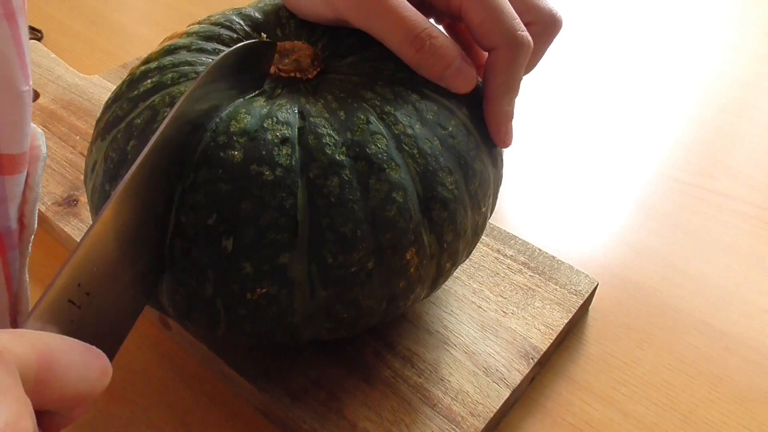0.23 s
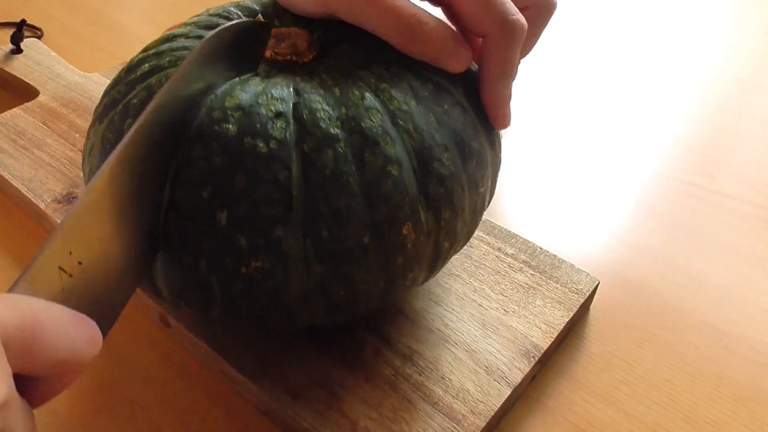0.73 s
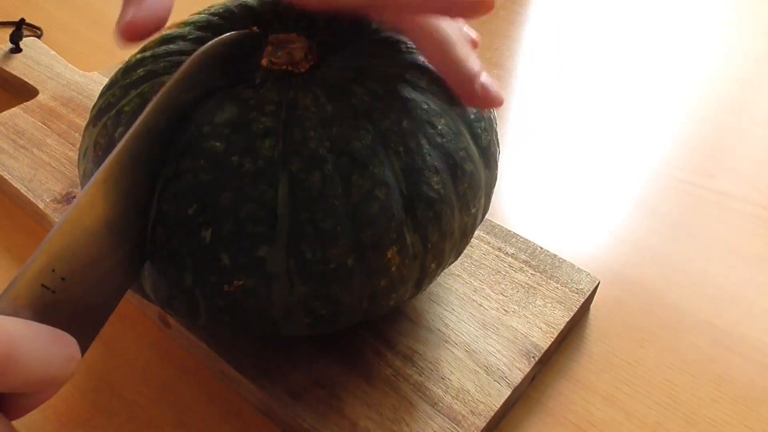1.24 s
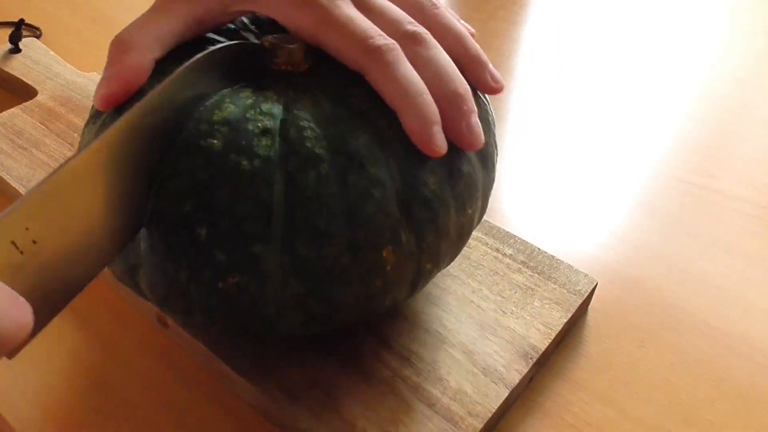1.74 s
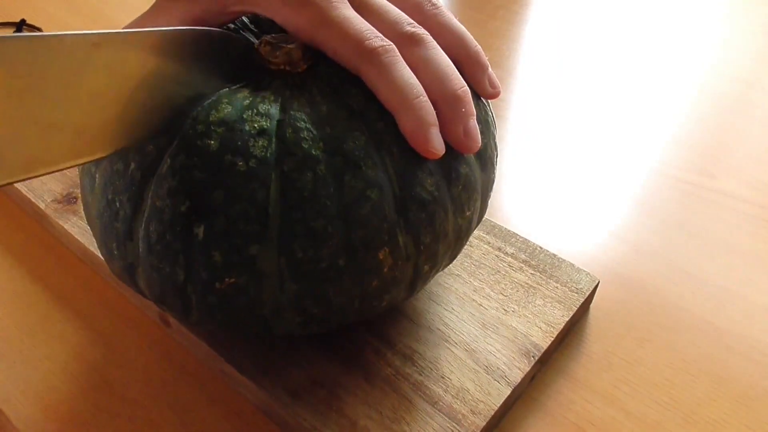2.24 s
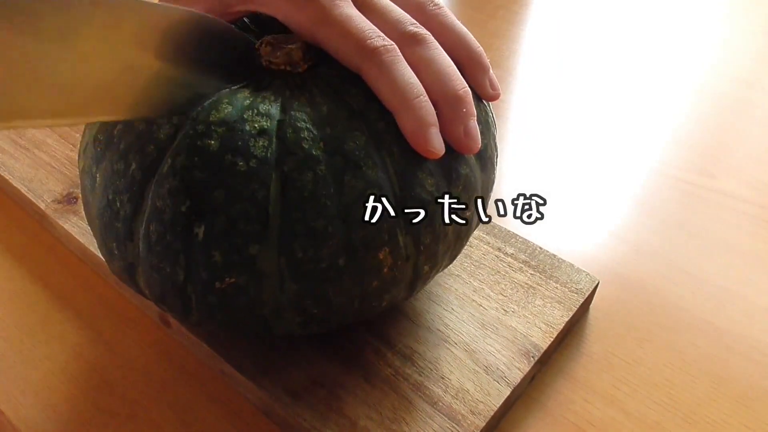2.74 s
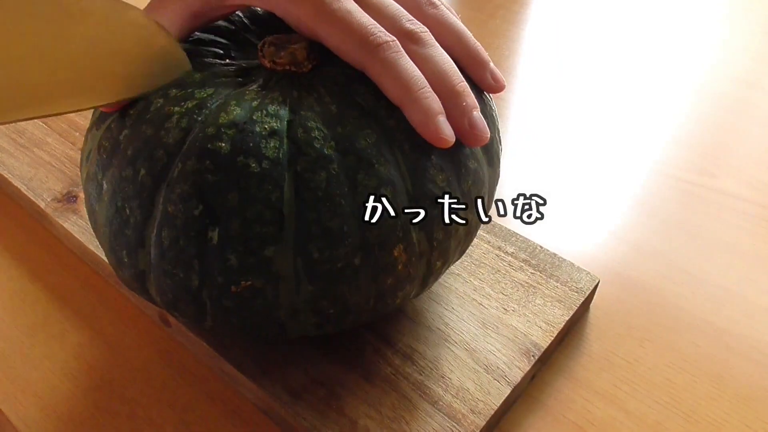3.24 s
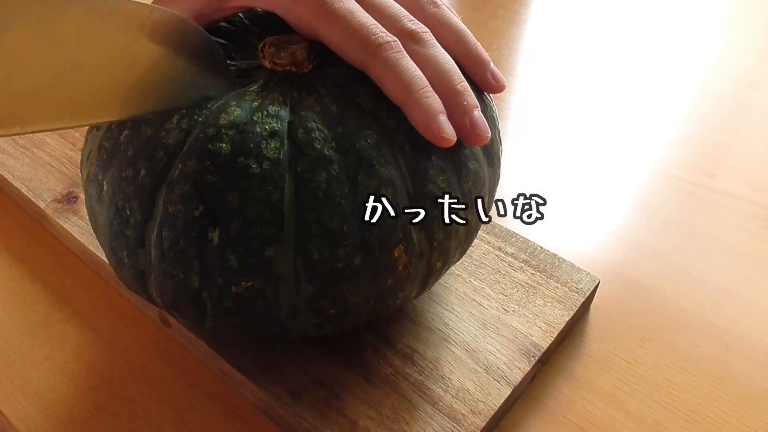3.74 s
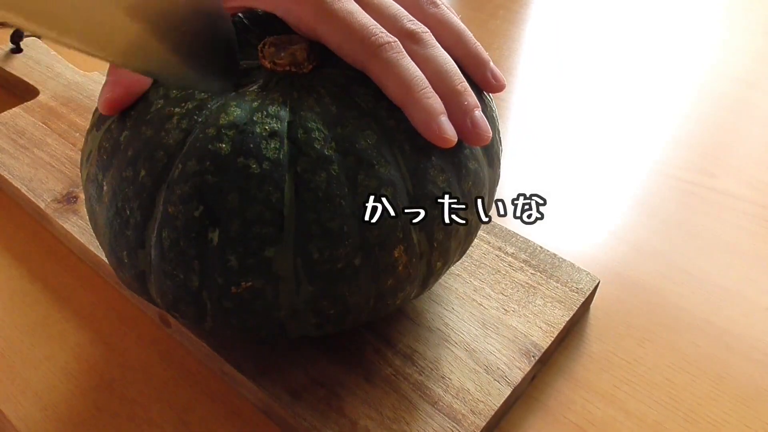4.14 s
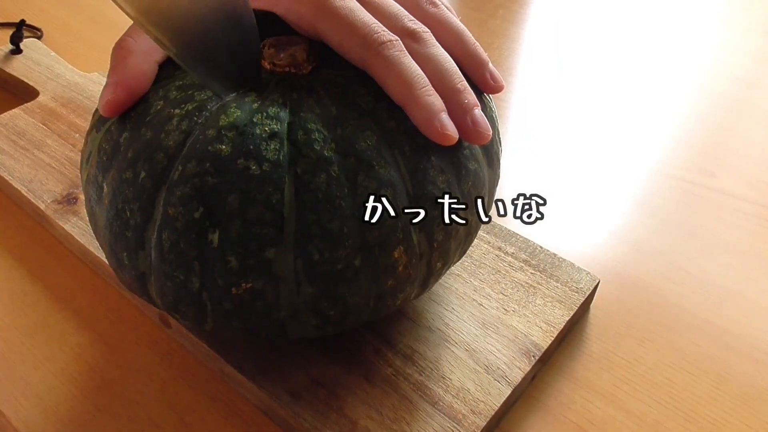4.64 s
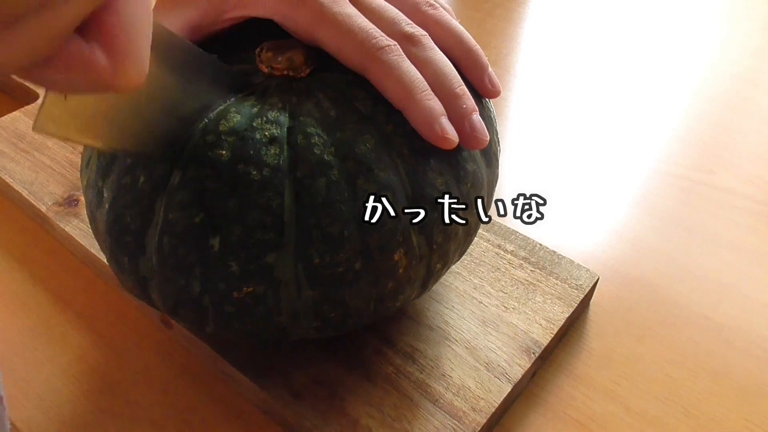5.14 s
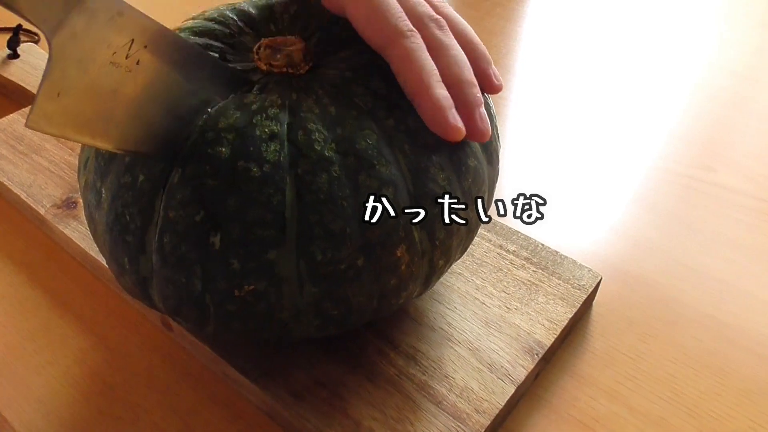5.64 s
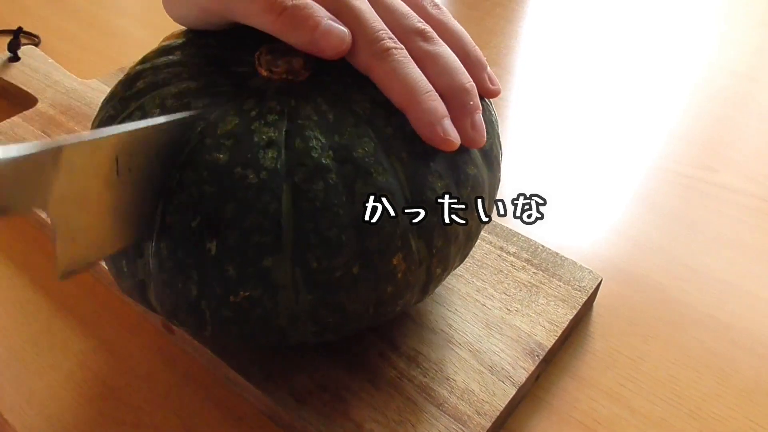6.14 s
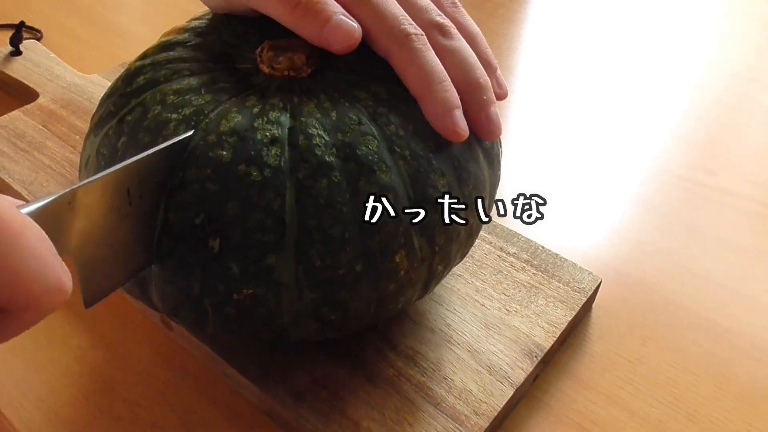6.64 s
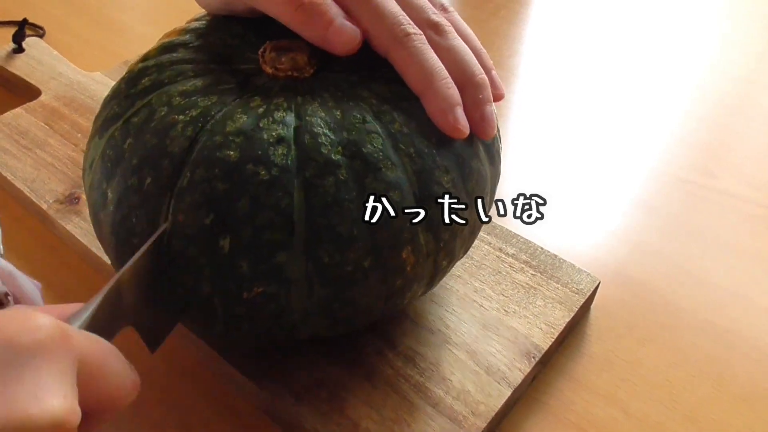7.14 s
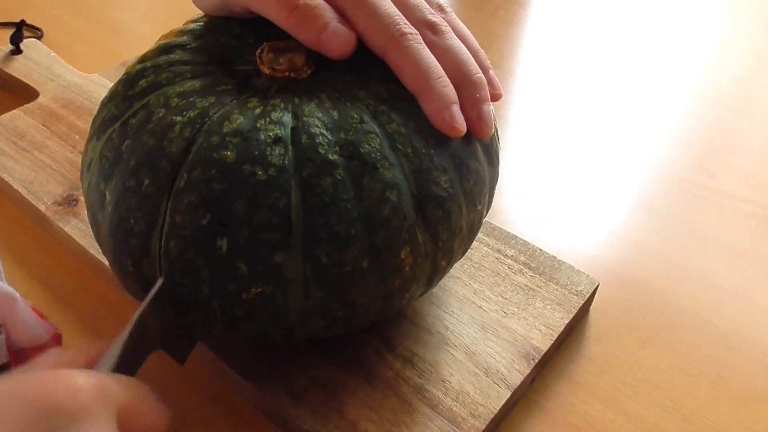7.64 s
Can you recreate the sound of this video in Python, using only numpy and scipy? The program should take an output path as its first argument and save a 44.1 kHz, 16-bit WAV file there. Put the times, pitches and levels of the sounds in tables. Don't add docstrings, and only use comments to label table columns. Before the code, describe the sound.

A small, quiet kitchen heard close in stereo, with low hum, light hiss and a faint fast-ticking motor throughout. At 0-0.5 s fingers rub the squash skin, with a soft scrape and small cracks. Around 1.1-1.4 s the rind snaps sharply over dull wooden thumps; stronger cracks and knocks cluster at 1.7-2.1 s. After a lull, the blade springs free with a thin tink at 2.9 s, followed by a crack and thump. From 3.6 to 5 s it is quieter: brief metallic chatter, light taps, short scrapes. At 5.1-5.5 s pressing brings crunches and brittle snaps. A solid thump lands at 6.05 s amid gritty scraping and cracks until 6.6 s. Scraping resumes near 6.9 s, then at 7.2 s the loudest moment: flesh rips in a bright crackle and the squash lands heavily. A final crack and clustered thumps come around 7.75 s.

```python
import sys
import numpy as np
from scipy import signal
from scipy.fft import rfft, irfft, next_fast_len
from scipy.io import wavfile
from scipy.ndimage import uniform_filter1d

SR = 44100
rng = np.random.default_rng(int(sys.argv[2]) if len(sys.argv) > 2 else 0)


def convert_level_to_amplitude(level_db):
    exponent = np.asarray(level_db, float) / 20
    return 10 ** exponent


def store_wav(level_fs):
    pcm = np.round(np.clip(np.atleast_2d(level_fs), -1, 1) * 32767)
    wavfile.write(sys.argv[1], SR, pcm.T.astype(np.int16))


N = 347949


def evened(x):
    return x / np.sqrt(np.mean(x ** 2) + 1e-20)


def read(points, hz):
    f, value = np.transpose(points)
    return np.interp(np.log(hz + 1), np.log(f + 1), value)


def follow(points):
    s, db = np.transpose(points)
    return np.interp(np.arange(N) / SR, s, db, -150, -150)


def add(mix, s, sound):
    part = mix[..., round(s * SR):][..., :sound.shape[-1]]
    part += sound[..., :part.shape[-1]]


def resonate(x, hz, width):
    return signal.lfilter(*signal.iirpeak(hz, hz / width, SR), x)


def resonate_twice(x, hz, width):
    return resonate(resonate(x, hz, width), hz, width)


def sing(rub, modes):
    return evened(sum(convert_level_to_amplitude(db) * evened(resonate_twice(rub, hz, width)) for hz, width, db in modes))


def glide(x, hz, width):
    turn = np.exp(2j * np.pi * np.cumsum(hz) / SR)
    r = np.exp(-np.pi * width / SR)
    smooth = signal.lfilter([(1 - r) ** 2], [1, -2 * r, r * r], x * turn.conj())
    return 2 * (turn * smooth).real


def ring(modes, t, rise, vary=0.95, apart=0., flip=1):
    hz, db, t60 = np.transpose(modes)[:, :, None]
    level, tune, phase = rng.standard_normal((len(modes), 3)).T[:, :, None]
    step = apart * phase * np.array([.5, -.5])[:, None, None]
    sines = np.sin(2 * np.pi * hz * (1 + 0.019 * vary * tune) * t + step)
    signs = flip ** np.arange(len(modes))[:, None]
    waves = signs * convert_level_to_amplitude(db + 2 * vary * level - 60 * t / t60) * sines
    return waves.sum(1) * (1 - np.exp(-t / rise)) ** 2


def colour(x, gain):
    size = next_fast_len(N)
    return irfft(rfft(x, size) * gain(np.fft.rfftfreq(size, 1 / SR)), size)[..., :N]


# frequency in Hz, level in dB per Hz.
AIR = [(12, -45), (20, -28), (124, -7), (230, -14.5), (289, -0.5), (314, -15.5), (382, -7), (690, -14.5),
       (863, -12), (2010, -33.5), (3830, -37.5), (6170, -42), (9150, -34), (15200, -40.5), (16500, -50)]
# frequency in Hz, width in Hz, level in dB.
WHINE = [(9040, 200, -78.5), (10530, 340, -84), (1290, 520, -72.5)]
# frequency in Hz, likeness from 0 to 1.
AIR_SAME = [(60, 0.87), (180, 0.91), (550, 0.6), (1650, 0.48), (4970, 0.031), (15000, 0.043)]
# frequency in Hz, left minus right in dB.
AIR_BALANCE = [(60, -3.5), (240, -3), (950, -0.5), (3770, 0), (15000, -1.5)]


def air():
    frames, hz = N // 256 + 5, np.fft.rfftfreq(1024, 1 / SR)
    a, b, c, d, patches = rng.standard_normal((frames, 513, 5)).T
    patches = evened(uniform_filter1d(uniform_filter1d(patches, 12, 0), 14, 1))
    same = np.clip(read(AIR_SAME, hz), -1, 1)[:, None]
    left, other = a + 1j * b, c + 1j * d
    z = np.array([left, same * left + np.sqrt(1 - same ** 2) * other])
    lean_db = read(AIR_BALANCE, hz)[:, None] / 2
    z *= convert_level_to_amplitude(read(AIR, hz)[:, None] + 1.8 * patches + np.array([lean_db, -lean_db]))
    hum = convert_level_to_amplitude(-53) * evened(signal.istft(z, nperseg=1024, noverlap=768)[1][:, :N])
    hiss = rng.standard_normal((2, N))
    return hum + sum(convert_level_to_amplitude(db) * evened(resonate_twice(hiss, f, width)) for f, width, db in WHINE)


# time in seconds, level in dB.
MOTOR_LEVEL = [(0, -85), (2.1, -73.5), (3.5, -92), (5.0, -93), (7.5, -76)]


def motor():
    ticks_per_s, housing_hz, width_hz = 67.3, 3750, 320
    t = np.arange(N) / SR
    puffs = np.exp(-(t * ticks_per_s % 1) / 0.15) * rng.standard_normal((2, N))
    ringing = resonate_twice(puffs[0] + 1.8 * puffs, housing_hz, width_hz)
    return convert_level_to_amplitude(np.interp(t, *np.transpose(MOTOR_LEVEL))) * evened(ringing)


# frequency in Hz, time to fall 60 dB in seconds.
ROOM = [(100, 0.67), (1000, 0.24), (10000, 0.008)]


def room(x):
    taps = np.zeros((2, SR // 2))
    at = np.arange(120, SR // 2 - 20, 20)
    at = at + rng.integers(0, 20, (2, len(at)))
    np.put_along_axis(taps, at, rng.choice([-1., 1.], at.shape), 1)
    hz, t, z = signal.stft(taps, SR, nperseg=256)
    tail = signal.istft(z * convert_level_to_amplitude(-60 * t / read(ROOM, hz)[:, None]), SR, nperseg=256)[1]
    return signal.fftconvolve(x[None], tail / np.linalg.norm(tail[0]), axes=1)[:, :N]


# delay in milliseconds, gain.
ECHOES = [
    [(.5, -0.03), (1.6, -0.15)],
    [(.8, -0.088), (2.1, 0.21)],
]


def echoed(x):
    return [one + sum(g * np.roll(one, round(ms * SR / 1000)) for ms, g in taps) for one, taps in zip(x, ECHOES)]


# time in seconds, level in dB.
HAND = [(0, -54), (.12, -54), (.2, -45.5), (.28, -51.5), (.34, -58)]


def hand():
    rub = rng.standard_normal(N)
    skin = evened(resonate(rub, 443, 54) + 0.051 * resonate(rub, 550, 160))
    return convert_level_to_amplitude(follow(HAND)) * skin


# frequency in Hz, level in dB, time to fall 60 dB in seconds.
TABLE = [(104.3, 1, 0.1), (136.9, 3.5, 0.28)]
BOARD = [(175.7, -1, 0.12), (202, 3.5, 0.12), (246, -2, 0.14)]
BODY = [(233, -20, 0.014), (273.4, 6.5, 0.07), (310.6, 9.5, 0.077), (382, -5.5, 0.15), (437, -3, 0.085),
        (509.5, -6, 0.08), (631, -2, 0.038), (790, -17.5, 0.18), (1114, -14.5, 0.12)]
KNOCK = [(554, -11, 0.028), (700, -20, 0.021)]
SWAY = [(48, 12, 0.16)]
# start in seconds, blow in dB, weight passed into the wood in dB against the blow.
ROCKS = [(0.296, -41, -3), (1.122, -35.5, -4), (1.143, -34, -6), (1.165, -37, 0), (1.731, -30.5, 1.5),
         (1.737, -25.5, -10), (1.747, -29.5, -9), (1.829, -32, -1), (1.847, -40, -1), (1.981, -30.5, 2.5),
         (1.988, -30.5, 1), (2.985, -39.5, 3.5), (5.137, -45, 5), (5.252, -42, -2), (5.404, -42, -3.5),
         (6.043, -30, -9), (6.049, -24.5, 2), (6.404, -31.5, 0), (6.792, -54, 11), (7.197, -25, 0),
         (7.2032, -15.5, 2), (7.357, -40, 6), (7.3605, -30, -8), (7.46, -36.5, -3), (7.594, -45.5, 4),
         (7.738, -32, -5), (7.744, -27, -4), (7.761, -21.5, -6.5), (7.789, -28.5, -10)]
# start in seconds, blow in dB.
JOLTS = [(2.871, -37), (3.626, -34), (3.641, -39), (4.264, -39), (4.595, -43), (4.656, -39.5), (4.915, -39),
         (4.999, -39), (5.845, -39.5), (6.928, -32.5)]
# start in seconds, level in dB.
PUSHES = [
    (1.16, -51),
    (5.135, -47),
    (5.82, -56),
]


def thumps():
    jolt_weight_db, table_db = -9, -3.5
    out, t = np.zeros((2, N)), np.arange(SR // 4) / SR
    for s, db, weight_db in ROCKS + [(s, db, jolt_weight_db) for s, db in JOLTS]:
        s += .0012
        wood_db = db + weight_db
        add(out, s, convert_level_to_amplitude(db - 6.0) * ring(BODY, t[:SR // 8], 0.0011, apart=0.39))
        add(out, s, convert_level_to_amplitude(db) * ring(KNOCK, t[:SR // 16], 0.00029, vary=1.1, apart=1.4))
        add(out, s, convert_level_to_amplitude(wood_db + 1.1) * ring(BOARD, t[:SR // 6], 0.0023, apart=0.048))
        add(out, s, convert_level_to_amplitude(wood_db + table_db) * ring(TABLE, t, 0.0015, apart=0.49))
    out = signal.lfilter(*signal.butter(2, 75, "high", fs=SR), out)
    for s, db in PUSHES:
        add(out, s, convert_level_to_amplitude(db) * ring(SWAY, t, 0.0066, apart=.6))
    return out


# start in seconds, touch in dB, weight in dB.
LANDINGS = [(1.7342, -29, -22), (1.8317, -31, -25), (1.9829, -32, -18.5), (6.0441, -18.5, -15),
            (7.1983, -9.5, -4.5), (7.7389, -25, -24)]


def landings():
    touch_hz, weight_hz, weight_lag_s = 480, 286, 0.00628
    out, t = np.zeros(N), np.arange(-300, 300) / SR
    u = 2 * np.pi * touch_hz * t - np.pi / 2
    w = (np.pi * weight_hz * t) ** 2
    touch = -np.sin(u) * np.exp(-u ** 2 / 8.2)
    crest = (1 - 2 * w) * np.exp(-w)
    for s, touch_db, weight_db in LANDINGS:
        add(out, s + t[0], convert_level_to_amplitude(touch_db) * touch)
        add(out, s + weight_lag_s + t[0], convert_level_to_amplitude(weight_db) * crest)
    return out


# frequency in Hz, width in Hz, level in dB.
WHET_MODES = [(4640, 77, -5), (5270, 36, 0), (6440, 97, -6), (7740, 47, 1), (9210, 100, 6)]
# start in seconds, length in seconds, level in dB.
WHETS = [
    (4.257, .06, -64),
    (4.58, 0.15, -71),
]


def whets():
    out = np.zeros(N)
    for s, length, db in WHETS:
        rub = rng.standard_normal(round(length * SR))
        add(out, s, convert_level_to_amplitude(db) * sing(rub, WHET_MODES) * signal.windows.tukey(len(rub), .4))
    return out


# frequency in Hz, level in dB, time to fall 60 dB in seconds.
BLADE = [(630, 10, 0.021), (950, 3.5, 0.024), (5600, 0, 0.025), (2880, -20, 0.33), (4600, -8, 0.06),
         (4885, -23, 0.75), (9960, -25, 0.4), (6325, -2, 0.028), (7370, -6, 0.045), (8025, -2, 0.03),
         (11470, -14, .04), (13210, -11, .065)]
# start in seconds, level in dB.
TINK = (2.872, -36)
# frequency in Hz, width in Hz, level in dB.
CHATTER_MODES = [(4590, 96, -2), (5100, 500, -3), (5600, 300, -6)]
# time in seconds, level in dB.
CHATTER = [(3.612, -85), (3.63, -65), (3.665, -64), (3.69, -65), (3.73, -86)]


def blade():
    out, t = np.zeros((2, N)), np.arange(SR // 2) / SR
    add(out, TINK[0], convert_level_to_amplitude(TINK[1]) * ring(BLADE, t, 0.00045, vary=0))
    return out + convert_level_to_amplitude(follow(CHATTER)) * sing(rng.standard_normal(N), CHATTER_MODES)


# time of full speed in seconds,
# run-up in seconds, hold in seconds, hiss in dB, squeal of the gripped blade in Hz.
CUTS = [(.2, 0.13, 0.041, -59.5, 7450), (4.287, 0.053, 0.0061, -60, 5250), (4.64, 0.25, 0.031, -62.5, 5770),
        (4.905, 0.053, 0.085, -54.5, 4200), (5.985, 0.04, 0.044, -52, 6450),
        (6.19, 0.079, 0.039, -51.5, 6100), (6.26, 0.16, .05, -51, 7800), (6.88, 0.069, 0.051, -51.5, 7850),
        (7.46, 0.018, 0.021, -45.5, 8200), (7.45, 0.059, .005, -53.5, 8000),
        (7.738, 0.025, 0.023, -44.5, 7500)]
SKIMS = [(1.07, 0.11, 0.0056, -65, 4000), (1.523, 0.024, 0.0029, -58.5, 8700),
         (1.688, .03, .005, -65.5, 6000), (2.868, 0.053, 0.0046, -54.5, 6000), (3.04, 0.2, .005, -62, 7500),
         (4.66, .08, .035, -62, 4300), (5.43, 0.069, 0.0058, -57, 5000), (5.505, 0.16, 0.012, -54.5, 9900),
         (5.527, .05, 0.053, -55, 4070), (6.49, .15, 0.0046, -54.5, 8700)]
RIPS = [(5.146, 0.021, .097, -51.5, 5400), (7.19, 0.062, .018, -43, 7500), (7.212, .02, 0.009, -54, 7500),
        (7.259, 0.0018, 0.013, -36, 7000), (7.275, 0.011, 0.013, -38, 4040),
        (7.325, 0.011, 0.0056, -49.5, 7000), (7.361, 0.0032, 0.023, -51, 2600)]
GRINDS = [(1.2, 0.17, 0.01, -80.5, 5000), (1.79, 0.11, 0.0082, -75, 5000), (2.9, .1, 0.011, -82.5, 6000),
          (4.62, .15, 0.065, -82.5, 6000), (6.33, 0.13, 0.0015, -70.5, 8100),
          (7.385, .01, 0.014, -76.5, 6000), (7.5, .03, 0.026, -79, 8000),
          (7.208, 0.031, 0.004, -59.5, 7500)]
# force in dB over the hiss, fall in dB per second.
CUT = (9.9, 390)
SKIM = (0, 320)
RIP = (9.6, 3300)
GRIND = (32.2, 356)
# time in seconds, level in dB.
CONTACT = [(0, -66.5), (.13, -73), (.31, -79), (1, -73.5), (1.3, -78), (1.72, -76), (1.86, -66),
           (2.1, -78.5), (3.2, -83.5), (5, -80), (5.3, -67), (5.65, -70), (5.95, -62.5), (6.08, -70),
           (6.43, -66), (7.07, -67.5), (7.25, -77), (7.89, -71)]


def strokes():
    run_up_db, rumble_share = 26.5, 0.7
    rest_db, rest_rumble_db, rest_share = -73, -58, 0.66
    t = np.arange(0, N + 32, 32) / SR
    hiss_db = np.interp(t, *np.transpose(CONTACT))
    rumble_db = rest_rumble_db + rest_share * (hiss_db - rest_db)
    for rows, (force_db, fall) in (CUTS, CUT), (SKIMS, SKIM), (RIPS, RIP), (GRINDS, GRIND):
        for s, rise, hold, db, hz in rows:
            under = np.maximum(run_up_db * (s - t) / rise, 0) + np.maximum(fall * (t - s - hold), 0)
            hiss_db = np.maximum(hiss_db, db - under)
            rumble_db = np.maximum(rumble_db, db + force_db - rumble_share * under)
    s, _, hold, _, hz = np.transpose(sorted(CUTS + SKIMS + RIPS))
    squeal_hz = np.interp(t, np.ravel([s, s + hold], "F"), np.repeat(hz, 2))
    return (np.interp(np.arange(N) / SR, t, curve) for curve in (hiss_db, rumble_db, squeal_hz))


# frequency in Hz, level in dB per Hz.
SCRAPE = [(2000, -43), (2900, -14), (3700, 1.5), (5500, -2.5), (8000, 0.5), (11000, -2), (14000, -8.5),
          (15600, -14), (16300, -43)]
CRUNCH = [(500, -5.5), (900, 11), (1500, 3), (2300, -12), (3200, -30), (5000, -13)]


def slides():
    hiss_db, rumble_db, squeal_hz = strokes()
    grip = convert_level_to_amplitude(2.2 * evened(uniform_filter1d(rng.standard_normal(N), 100)))
    sizes = convert_level_to_amplitude(2.4 * np.minimum(rng.exponential(1, N), 5))
    grains = rng.standard_normal((3, N)) * sizes * (rng.random(N) < .4)
    grains = grip * (grains[0] + 0.29 * grains[1:])
    hiss = evened(colour(grains, lambda hz: convert_level_to_amplitude(read(SCRAPE, hz))))
    squeal_db = .45 * (hiss_db - rumble_db) - 3.5
    hiss = hiss + convert_level_to_amplitude(squeal_db) * evened(glide(hiss, squeal_hz, 2100))
    crunch = evened(colour(grains, lambda hz: convert_level_to_amplitude(read(CRUNCH, hz))))
    crunch_db = 0.62 * hiss_db + 0.65 * rumble_db + 3.5
    shove = rng.standard_normal((3, N)) * np.sqrt(grip)
    shove = shove[0] + 0.5 * shove[1:]
    modes = BOARD + BODY[1:]
    rumble = evened(sum(convert_level_to_amplitude(db) * np.sqrt(t60) * resonate(shove, hz, 1.47 / t60) for hz, db, t60 in modes))
    return convert_level_to_amplitude(hiss_db) * hiss + convert_level_to_amplitude(crunch_db) * crunch, convert_level_to_amplitude(rumble_db) * rumble


# frequency in Hz, level in dB, time to fall 60 dB in seconds.
HOLLOW = [(1069, 7, 0.012), (1297, -6, 0.017)]
SHELL = [(2240, -5, 0.012), (2476, -10, 0.026), (3057, -6.5, 0.012), (3580, 1, 0.011)]
RIND = [(4910, 3, 0.007), (5425, 5, 0.005), (6070, 9, 0.0042), (7000, 11, 0.0025), (7700, 10, 0.0045),
        (8730, 4, 0.004)]
EDGE = [(9900, 9.5, 0.0016), (10960, -6, 0.0051), (13260, -4, 0.0077), (15200, -6, .005)]
# frequency in Hz, left minus right in dB.
CUT_LEAN = [(2200, 2), (2900, 8.5), (3600, 12), (4300, 4), (5000, -10), (5700, 9), (7300, -16), (8600, -3)]
BREAK_HZ = (2600, 9300)
# hollow in dB, shell in dB, edge brightness in dB, front click in dB.
CRACKS = [(0.3597, -37.5), (0.4726, -41.5), (0.8185, -46.5), (1.1929, -27.5), (1.2246, -47),
          (1.2646, -29.5), (1.381, -42.5), (1.441, -47), (1.7981, -22.5), (1.8422, -37), (1.8856, -25),
          (2.0356, -25), (2.0686, -44), (2.9653, -26), (3.0812, -37.5), (3.184, -45), (3.306, -46.5),
          (5.2478, -24.5), (5.3007, -29), (5.3275, -52), (5.366, -26.5), (6.127, -31.5), (6.1986, -32.5),
          (6.3813, -27), (7.7266, -19)]
CRACK = (-9, -7.5, -20, 0)
NICKS = [(1.106, -50), (1.1166, -44.5), (1.1433, -41.5), (1.7555, -45), (2.8707, -33), (4.2635, -43),
         (5.0937, -46), (5.179, -41), (5.187, -42), (5.4308, -41), (5.438, -45), (5.9647, -30),
         (5.9816, -45), (6.0015, -54), (6.0085, -51), (6.04, -39), (6.4644, -43), (6.484, -37),
         (7.202, -22.5), (7.2583, -31), (7.3595, -43), (7.7959, -35)]
NICK = (-11, -17, -15.5, -8)
TEARS = [(5.8465, -48.5), (6.0478, -43), (6.0865, -47), (6.329, -45), (6.4193, -45), (6.518, -45),
         (6.5455, -42.5), (6.5674, -48), (6.834, -44), (6.845, -47), (6.949, -52), (7.126, -48),
         (7.2665, -21), (7.3101, -34), (7.3745, -36), (7.455, -41.5)]
TEAR = (-4, -4, -12.5, -12)
PIPS = [(1.057, -43.5), (1.068, -54), (1.775, -56), (1.787, -47), (5.0608, -43), (5.103, -50), (5.385, -46),
        (6.02, -48), (6.034, -45), (6.059, -50), (6.106, -50), (6.141, -51), (6.172, -42), (6.186, -43),
        (7.03, -54), (7.105, -54), (7.218, -33), (7.3258, -34), (7.33, -43)]
PIP = (-6, -4, -23, -8)
POCKS = [(.298, -58), (1.8295, -48), (5.232, -49), (7.276, -50), (7.291, -54), (7.358, -43), (7.7268, -38),
         (7.7305, -44), (7.74, -45)]
POCK = (15, 0.5, -26, -15)
FLECKS = [(6.3905, -46), (7.2602, -20.5), (7.2655, -21.5), (7.2707, -21), (7.2800, -25), (7.2835, -27),
          (7.2890, -40), (7.3660, -31), (7.3732, -30), (7.3805, -28), (7.3865, -49), (7.7400, -46),
          (7.7600, -48)]
FLECK = (-6, -6, -8, -20)
SPLITS = [(5.8078, -31), (6.2168, -39), (6.3185, -27)]
SPLIT = (-9, -12, -22, 14)


def snaps():
    early = 44
    out, t = np.zeros((2, N)), np.arange(SR // 36) / SR
    lean_db = np.array([[-1], [1]]) * read(CUT_LEAN, np.fft.rfftfreq(len(t), 1 / SR))
    kinds = ((CRACKS, CRACK), (NICKS, NICK), (TEARS, TEAR), (PIPS, PIP), (POCKS, POCK),
             (FLECKS, FLECK), (SPLITS, SPLIT))
    front = signal.lfilter(*signal.butter(2, 1500, "high", fs=SR), signal.unit_impulse(len(t), idx=1))
    band = signal.butter(2, BREAK_HZ, "band", fs=SR)
    for s, db, hollow_db, shell_db, edge_db, front_db in [row + tone for rows, tone in kinds for row in rows]:
        rind = convert_level_to_amplitude(-8.5) * ring(RIND, t, .00004, vary=.6, flip=-0.94)
        shell = convert_level_to_amplitude(shell_db + 2.0) * ring(SHELL, t, .00006, vary=.5, apart=.5)
        edge = convert_level_to_amplitude(edge_db + 8.0) * ring(EDGE, t, .00003, vary=.4)
        click = convert_level_to_amplitude(front_db) * front
        add(out, s, convert_level_to_amplitude(db + hollow_db + 9.0) * ring(HOLLOW, t, 0.0022, vary=.4, apart=1.5))
        fibres = np.diff(rng.standard_normal(len(t) + 1)) * convert_level_to_amplitude(-38 - 60 * t / 0.015)
        burst = evened(rng.standard_normal(len(t)) * convert_level_to_amplitude(-60 * t / 0.0076) * (1 - np.exp(-t / 0.00026)))
        burst = convert_level_to_amplitude(-21.0) * signal.lfilter(*band, burst)
        snap = np.roll(convert_level_to_amplitude(db) * (rind + shell + edge + click + fibres + burst), early, axis=1)
        share, lag = (1, 9) if s < 5.5 else (0.28, 1)
        shade = np.sqrt(2 / (1 + convert_level_to_amplitude(2 * share * lean_db)))
        left, right = irfft(rfft(snap) * shade, len(t))
        add(out[0], s - early / SR, left)
        add(out[1], s + (lag - early) / SR, right)
    return out


# frequency in Hz, left minus right in dB.
PORT_BALANCE = [(60, -4), (180, -3.5), (550, -2), (1650, 1.5), (4970, 2.5), (15000, -2)]


def scene():
    hiss, rumble = slides()
    hiss = np.array([hiss[0], np.roll(hiss[1], 1)])
    bass = thumps() + landings() + rumble + hand()
    treble = hiss + snaps() + blade() + whets()
    sign = np.array([[.5], [-.5]])
    ports = colour(bass + echoed(treble), lambda hz: convert_level_to_amplitude(sign * read(PORT_BALANCE, hz)))
    return ports + convert_level_to_amplitude(-20.5) * room(bass[0] + treble[0]) + air() + motor()


def low_pass(x):
    return signal.sosfilt(signal.butter(12, 16820, fs=SR, output="sos"), x)


def record(dry):
    edge = signal.firwin(255, 16100, window=("kaiser", 5), fs=SR)
    finished = signal.oaconvolve(dry, edge[None], "same")
    return low_pass(finished)


dry = scene()
out = record(dry)
store_wav(out)
```